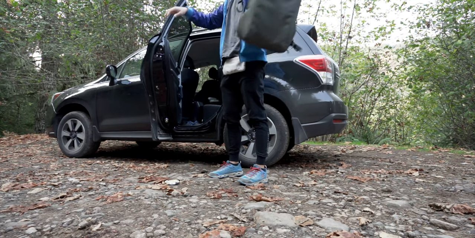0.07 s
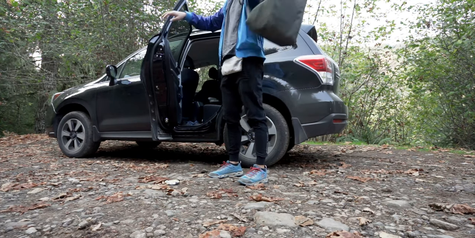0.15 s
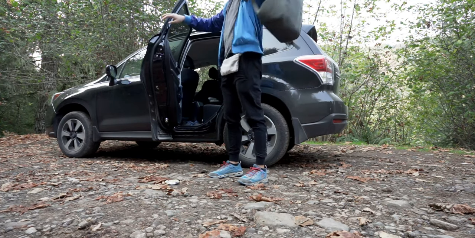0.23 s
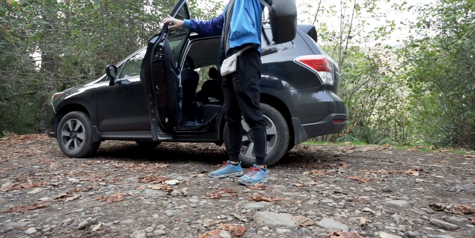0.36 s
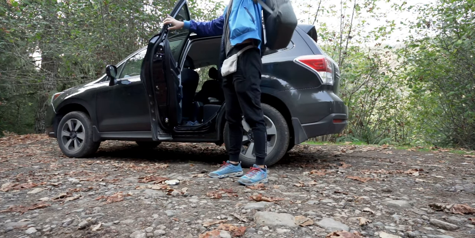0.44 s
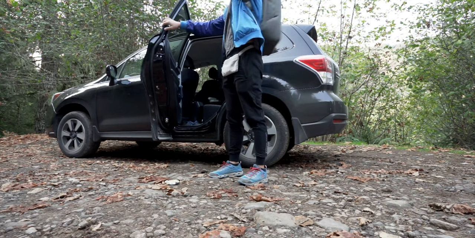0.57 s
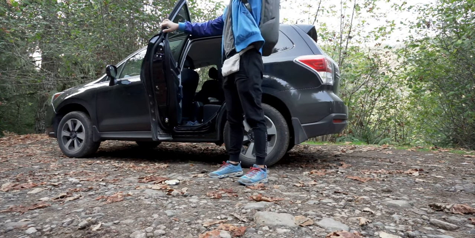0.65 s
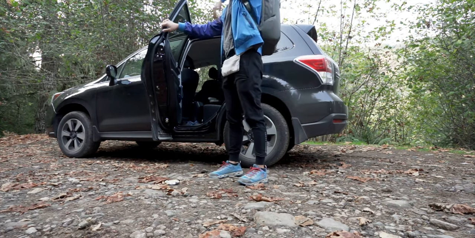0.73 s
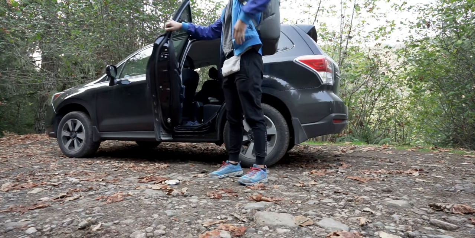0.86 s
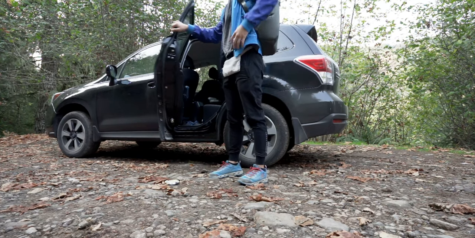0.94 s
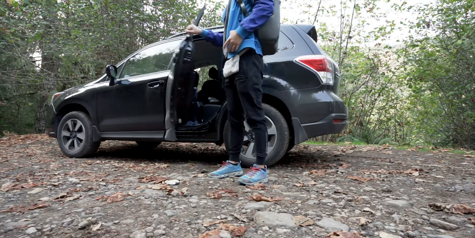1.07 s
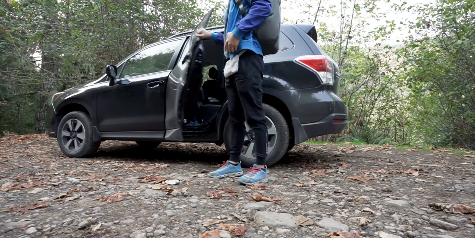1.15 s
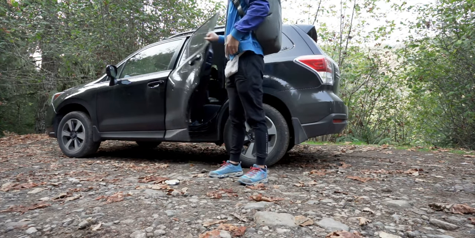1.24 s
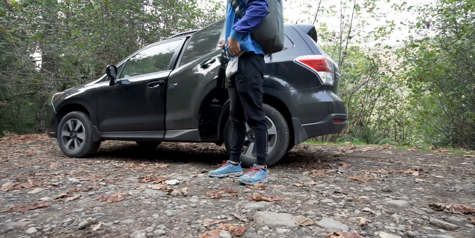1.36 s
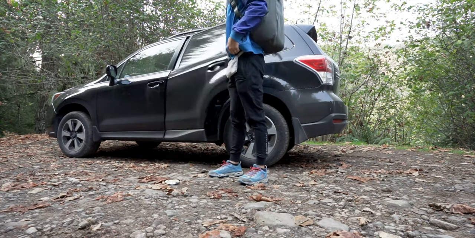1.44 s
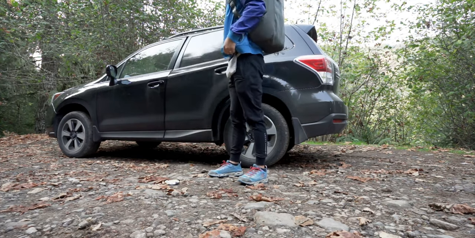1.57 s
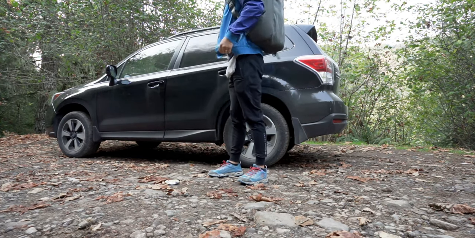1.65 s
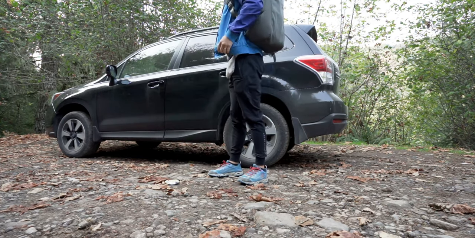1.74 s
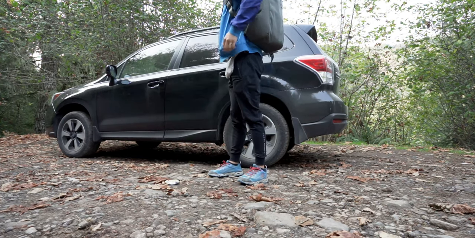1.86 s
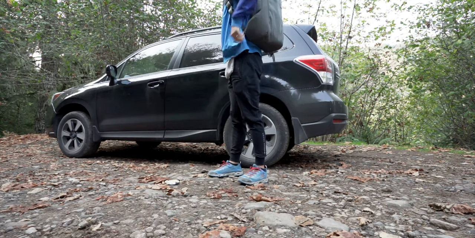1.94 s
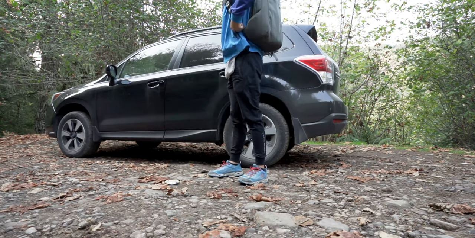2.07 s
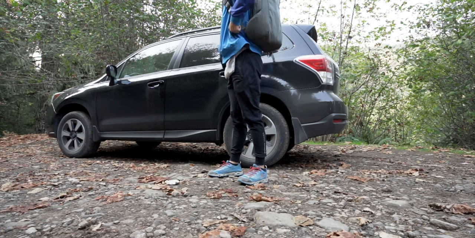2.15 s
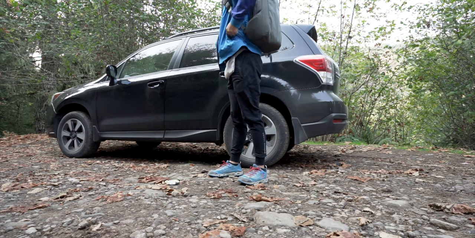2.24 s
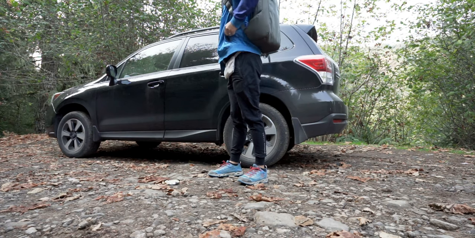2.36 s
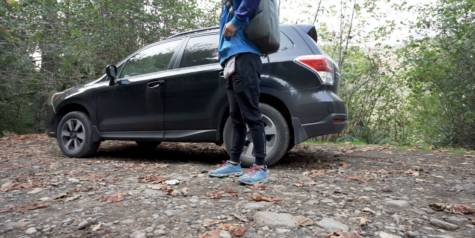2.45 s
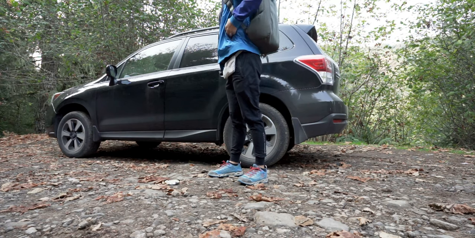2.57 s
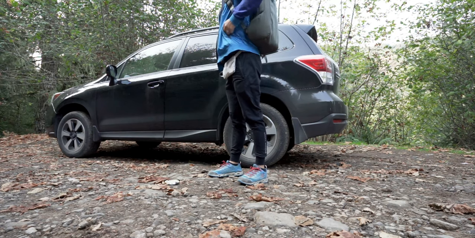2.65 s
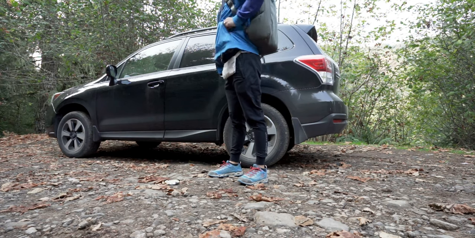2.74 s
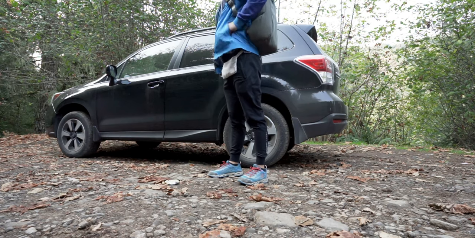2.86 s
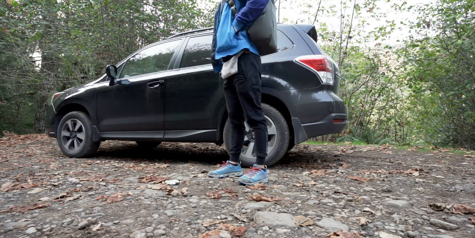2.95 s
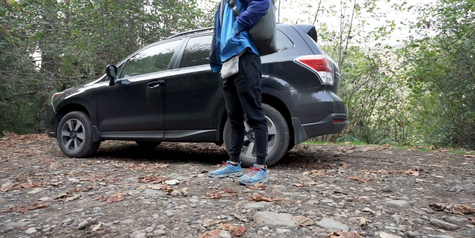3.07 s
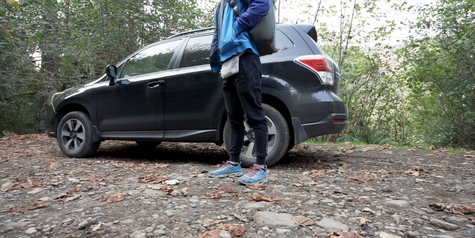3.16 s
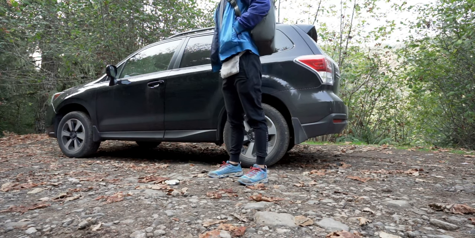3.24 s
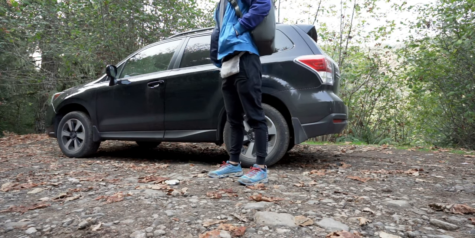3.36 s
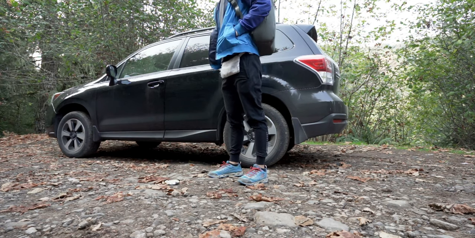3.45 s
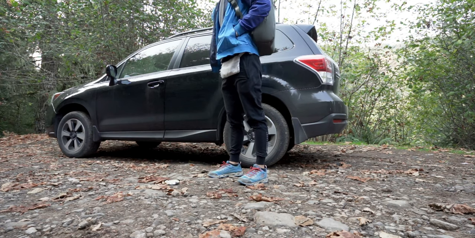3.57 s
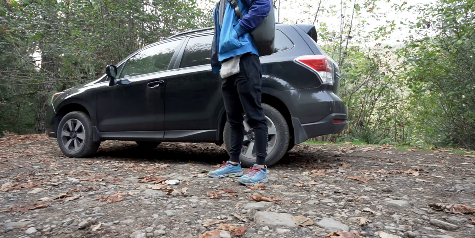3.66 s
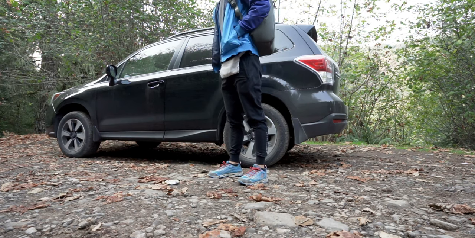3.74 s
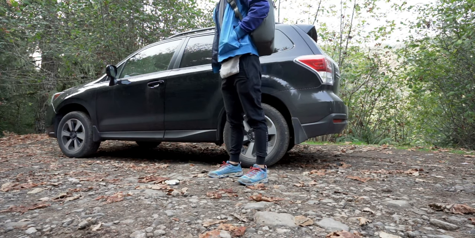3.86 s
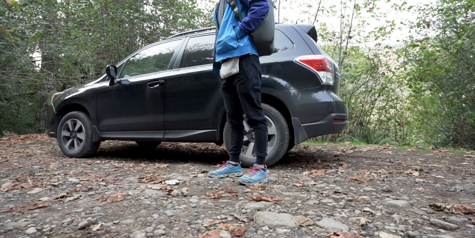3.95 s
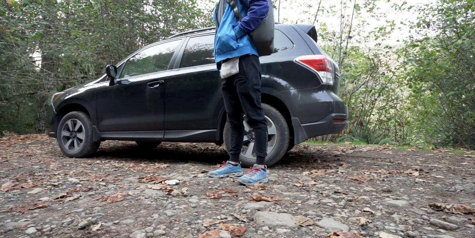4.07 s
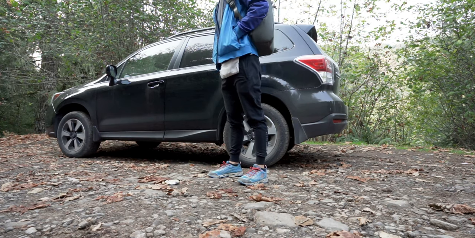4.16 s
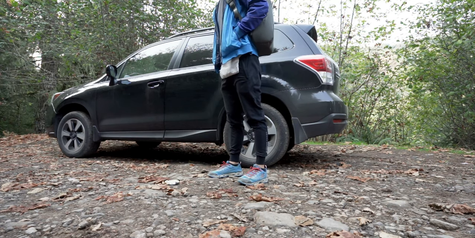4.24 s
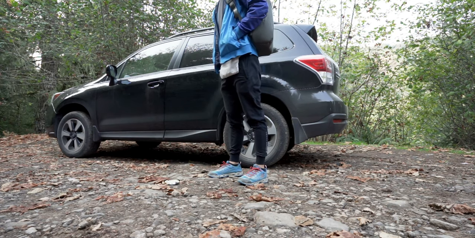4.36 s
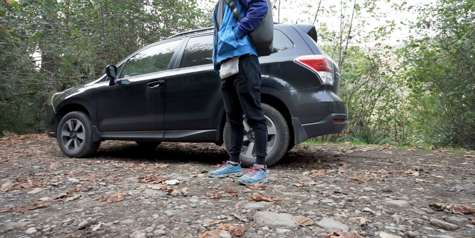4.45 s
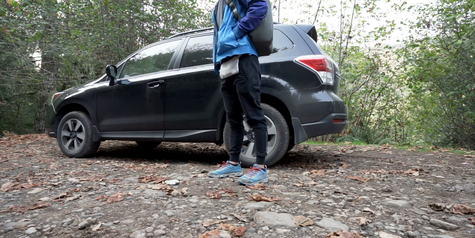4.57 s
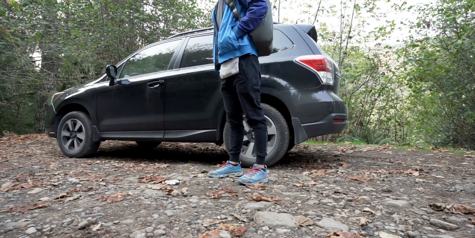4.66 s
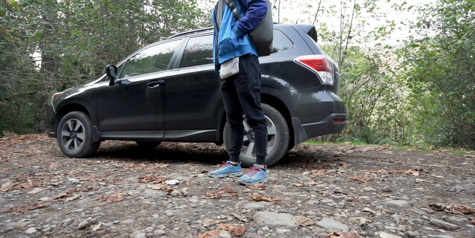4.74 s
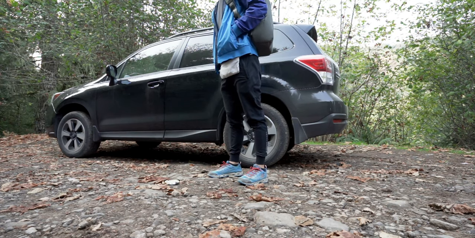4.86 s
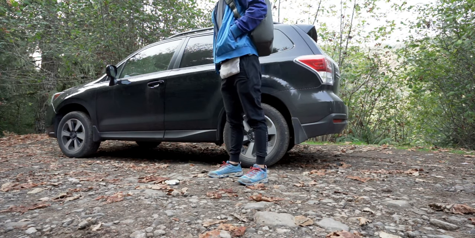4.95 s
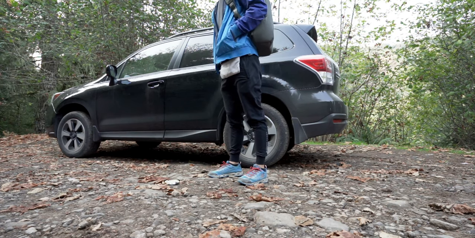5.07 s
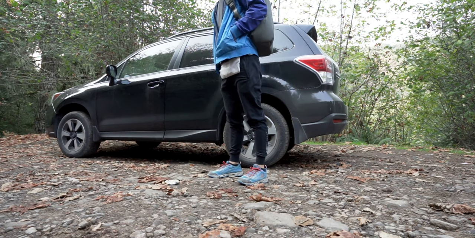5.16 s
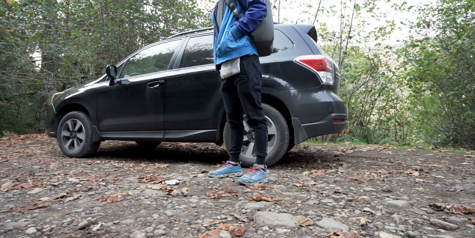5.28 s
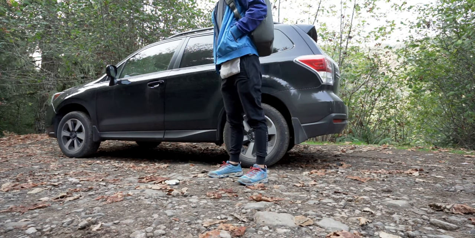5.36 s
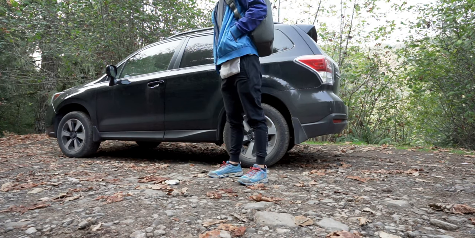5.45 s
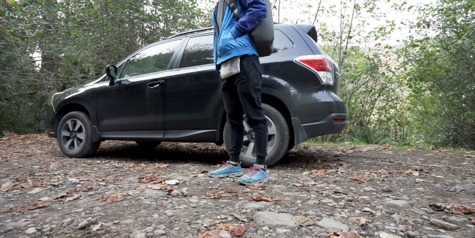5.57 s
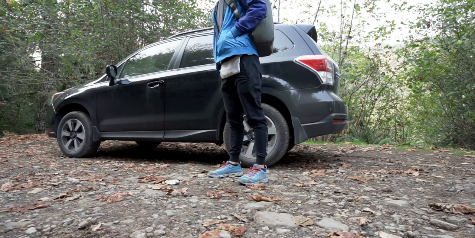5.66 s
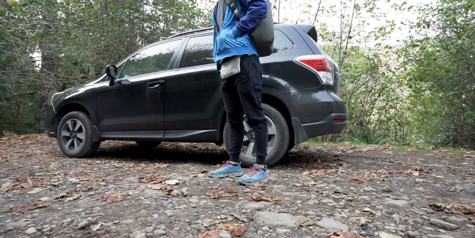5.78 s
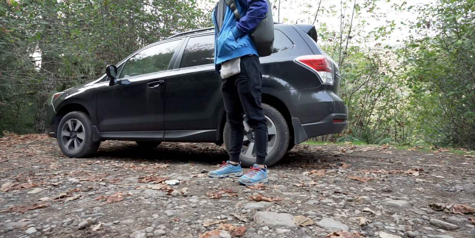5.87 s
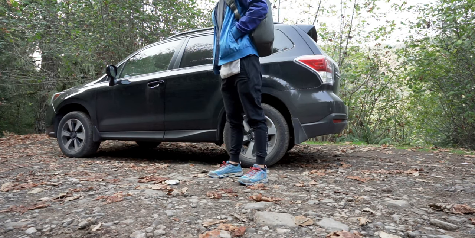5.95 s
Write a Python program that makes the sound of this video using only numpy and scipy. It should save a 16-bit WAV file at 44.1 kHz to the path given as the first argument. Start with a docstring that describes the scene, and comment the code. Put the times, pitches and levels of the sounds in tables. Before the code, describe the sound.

Soft fabric swishes and a buckle click come from someone shouldering a backpack beside a car. The door knocks lightly as it swings, then latches with a heavy, slightly distorted slam and a short rattle of trim, by far the loudest sound. Afterwards clothing rustles and small objects click in a pocket, close by, over a faint low outdoor rumble and hiss.

```python
"""Nylon rustles over a low rumble and faint woods as a hiker beside a car swings a backpack on.
A strap slides over the shoulder; buckles and small hard things in a pocket click. The car door passes
its hinge stops, latches and slams near 1.8 s: blows ring the panel and rattle loose trim, squeezed
cabin air pumps, and the input overloads. Rustle and clicks carry on, then fade.
Cloth, strap and clicks arrive twice, directly and off the gravel."""
import sys
import numpy as np
from scipy import signal
from scipy.fft import rfft, irfft
from scipy.io import wavfile
from scipy.ndimage import uniform_filter1d

SR = 44100
rng = np.random.default_rng(int(sys.argv[2]) if len(sys.argv) > 2 else 0)


def waveform_to_disk(signal):
    """Save audio, clipped to [-1, 1], as 16-bit WAV at the path in sys.argv[1]."""
    frames = np.transpose(np.atleast_2d(signal))
    scaled = np.clip(frames, -1, 1) * 32767
    samples = np.round(scaled).astype(np.int16)
    wavfile.write(sys.argv[1], SR, samples)


N = 265173

# Slow movement of jacket and pack. Each row: time in seconds, level in dB, relative treble in dB.
CLOTH_MOTION = [(0.0, -48.5, -7), (0.05, -42.5, -8.5), (0.155, -41.5, -2.5), (0.434, -40.5, -0.5),
                (0.567, -37, -7), (0.75, -43, -7), (0.9, -44, -6.5), (1.2, -46, -3.5), (1.29, -48.5, -9),
                (1.6, -52.5, -6.5), (1.96, -50, -9), (2.2, -48, -3.5), (2.5, -54.5, -3), (3.1, -45, -3.5),
                (3.45, -48, -7), (4.1, -56, -5.5), (4.6, -57, -4), (5.3, -66.5, -1), (6.011, -53.5, -9)]
# Cloth swishes. Each row: peak time in seconds, level in dB, length in ms, relative treble in dB.
CLOTH_SWISHES = [(0.641, -29.5, 26, -3.5), (0.993, -38.5, 25, -16), (1.477, -47, 84, -4),
                 (2.007, -43, 18, 0), (2.081, -41.5, 20, 8), (2.13, -40.5, 83, -4.5), (2.285, -41, 30, -3),
                 (2.365, -44.5, 42, -1.5), (2.459, -45, 27, -4), (2.599, -44, 50, -3.5),
                 (2.784, -45.5, 60, -2.5), (2.939, -41.5, 33, -5), (3.068, -42.5, 116, -6),
                 (3.387, -53, 36, -13), (3.502, -43.5, 26, -8), (3.83, -46.5, 117, -5),
                 (4.021, -48, 24, -5), (4.201, -45.5, 80, -7), (4.382, -40, 20, -8.5), (4.575, -55, 26, -7),
                 (4.7, -55, 57, -10), (4.97, -49, 190, -3), (5.064, -36, 13.5, -8), (5.188, -51.5, 27, -3),
                 (5.712, -48, 114, -4.5), (6.01, -49, 88, -6)]
# Rubbing nylon. Each row: frequency in Hz, relative density in dB.
CLOTH_SPECTRUM = [(180, -26), (300, 3), (708, 0.5), (937, 0.5), (1280, 0), (2210, -4.5), (2480, -2),
                  (4140, -2), (15500, -27.5)]
# Ground echo, later while the pack is at shoulder height. Each row: time in seconds, lag in ms.
ECHO_LAG = [(0, 1.58), (.6, 1.58), (.8, 1.27), (6.01, 1.25)]
# Pack and door rumble. Each row: time in seconds, level in dB.
RUMBLE_LEVELS = [(0, -58), (.1, -53.5), (.45, -56), (.65, -43.5), (.75, -45), (.87, -56.5), (1.03, -53),
                 (1.117, -35), (1.2, -47), (1.38, -42.5), (1.6, -47), (1.96, -41), (2.05, -47.5),
                 (2.37, -53), (2.45, -58), (3.5, -57), (4.6, -61), (6.011, -59.5)]
# Distant woods. Each row: frequency in Hz, relative density in dB.
WOODS_SPECTRUM = [(15, -32), (25, -8), (64, -3), (178, -21.5), (215, -22), (482, -19.5), (826, -16.5),
                  (1050, -16.5), (1240, -17.5), (15500, -39.5)]
# Buckle, latch and pocket clicks. Each row: start in seconds, level in dB, ring in Hz,
# relative brightness in dB, decay time in ms.
HARD_CLICKS = [(0.2252, -29, 780, -15.5, 3), (0.6573, -15.5, 1170, -28, .8), (0.668, -27, 695, -10, 4.4),
               (0.6944, -19.5, 624, -22, 1.8), (0.7458, -28, 656, -25, 3.4), (0.9484, -26, 584, -13, 0.83),
               (0.984, -26, 1700, -5.5, 3.6), (0.998, -31, 800, -25, 3), (1.046, -28, 570, -8, 3),
               (1.0649, -31, 559, -1, 2), (1.5627, -32.5, 559, -7, 1.8), (1.6304, -31, 1270, -30, 2.2),
               (1.7852, -8, 1500, -22, 1.6), (1.9843, -32, 1733, -11, 1.6), (1.9998, -29, 3770, -14, 1.7),
               (2.1577, -28.5, 1750, 1, 1.5), (2.3684, -26, 845, -16, 1), (2.4998, -25, 1810, -6, 1.2),
               (2.5973, -35.5, 950, -13, 3.5), (2.711, -35.5, 12500, 3, 0.74),
               (2.916, -28.5, 2745, -7, 1.7), (2.927, -26.5, 3900, -2, 3.4), (2.9362, -30, 1302, -1, 1.0),
               (3.0343, -24, 3219, -1, 1.3), (3.0646, -26.5, 1670, -13, 1.9),
               (3.225, -27.5, 3130, -15, 0.86), (3.3843, -32, 2853, -5, 2), (3.3948, -27.5, 3270, -6, 2.3),
               (3.4911, -34, 3003, -13, 3.2), (3.505, -18.5, 3230, -9.5, 1.65),
               (3.5487, -18, 3880, -23, 4.7), (3.5525, -18, 1710, 0, 2.9), (3.5704, -20, 1820, -11, 1.6),
               (3.588, -31.5, 1614, -11, 3.0), (3.6882, -34, 2454, -8, 1.6),
               (3.7322, -28.5, 7900, -2, 0.66), (3.7664, -37, 1561, 3, 2.8), (3.848, -26, 2380, -14, 1.6),
               (3.852, -19.5, 1750, -11.5, 1.66), (3.8839, -27, 3800, -17, 1.8),
               (3.925, -23.5, 3402, -9, 1), (4.0277, -28, 1750, -1.5, 2.3), (4.0744, -35.5, 2508, -15, 2.9),
               (4.175, -27, 2540, -7, 2.2), (4.1902, -22.5, 3160, -7, 1.1), (4.2158, -21.5, 3370, -7, 3.9),
               (4.488, -30.5, 13500, -16, 1.4), (4.5622, -32.5, 2422, -6.5, 2.1),
               (4.681, -32, 2350, -8, 1.4), (4.688, -34, 2400, -7, 1.2), (4.7878, -28.5, 1630, -6, 2.9),
               (4.8878, -31, 2906, -7, 0.61), (4.9566, -27, 2900, -15, 1.3),
               (4.9814, -26.5, 2487, -15, 3.5), (5.0515, -26.5, 3340, 1.5, 3.2),
               (5.055, -25, 3540, -1, 3.7), (5.0604, -25, 2573, 5, 3.2), (5.072, -23.5, 3200, -2, 1.1),
               (5.1013, -31, 1800, -18, 1.8), (5.1287, -36, 3262, -14, 1.8), (5.141, -32.5, 3220, -18, 1.6),
               (5.1763, -26.5, 1880, -14, 2.6), (5.1958, -32.5, 2250, -16, 2.1),
               (5.219, -37.5, 3150, -8, 3.0), (5.285, -45, 3260, -13, 3.2), (5.4178, -35, 3300, -4, 1.7),
               (5.4746, -28.5, 3950, -3.5, 3.4), (5.518, -27, 1900, -16, 1.2),
               (5.656, -31.5, 3316, -17, 0.9), (5.681, -36, 2400, -7.3, 0.9), (5.722, -38, 3000, -6, 1),
               (5.731, -38, 2500, 0, .7)]
# Blows on the car body. Each row: start in seconds, strength in dB, contact in ms, low cut in Hz,
# rattle drive in dB.
DOOR_BLOWS = [(0.6578, -20.5, 0.86, 483, -40), (0.658, -31, 4.7, 87.5, -34), (0.682, -40, 1.8, 90, -35),
              (0.716, -45, 9.9, 70.5, -58), (1.097, -29.5, 1.45, 250, -35), (1.119, -29, 2, 150, -40),
              (1.162, -36, 5.3, 60, -58), (1.367, -22.5, 2.23, 134, -29.5), (1.395, -31.5, 4.2, 80, -59),
              (1.693, -27, 4.3, 80, -54), (1.7645, -2.5, 1.9, 240, -15), (1.782, -2, 2.7, 40, -8),
              (1.7852, -8, 1.66, 500, -8), (1.807, -6.5, 4.5, 50, -21), (1.814, -12, 12, 50, -35),
              (1.828, -9.5, 3.3, 79, -29.5), (1.847, -18.5, 2.6, 80, -25), (3.052, -36, 4.1, 90, -38),
              (3.079, -35.5, 2.7, 90, -60)]
# Door panel modes. Each row: frequency in Hz, gain in dB.
PANEL_MODES = [(58, -2), (78, -18.5), (95, -12), (122, -4), (150, -14), (172, -4.5), (210, -16),
               (243, -10.5), (291, -6.5), (327, -19), (380, -6.5), (425, -10.5), (488, -22.5), (540, -1.5),
               (613, -11.5), (721, -43.5), (812, -9), (940, -21.5), (1050, -17), (1267, -19), (1386, -18.5)]
# Body shudder and loose trim. Each row: band frequency in Hz, gain in dB, T60 in seconds.
TRIM_BANDS = [(50, -17.5, 0.58), (168, -22, 0.65), (120, -9, 0.34), (214, -8.5, 0.26), (430, -6.5, 0.17),
              (1003, -7, 0.12), (1895, -11.5, 0.054), (3630, -24, 0.085), (7000, -28, 0.089),
              (12000, -50.5, 0.032)]


def undb(db):
    return 10 ** (np.asarray(db) / 20)


def unit_rms(x):
    return x / np.sqrt(np.mean(x ** 2))


def curve(points):
    """Per-sample values through (seconds, value) points."""
    return np.interp(np.arange(N) / SR, *np.transpose(points))


def shaped_noise(spectrum):
    """Noise shaped by (Hz, dB) points on a log axis; rms 1."""
    hz, db = np.transpose(spectrum)
    bins_hz = np.maximum(np.arange(N // 2 + 1) * SR / N, 1)
    gain = undb(np.interp(np.log(bins_hz), np.log(hz), db))
    return unit_rms(irfft(rfft(rng.standard_normal(N)) * gain, N))


def band(x, low_hz, high_hz):
    sos = signal.butter(2, [low_hz, min(high_hz, SR / 2.1)], "band", fs=SR, output="sos")
    return signal.sosfilt(sos, x)


def band_noise(low_hz, high_hz):
    return unit_rms(band(rng.standard_normal(N), low_hz, high_hz))


def ring(x, hz, t60_s):
    """One decaying mode; a unit impulse rings with amplitude 1."""
    pole = np.exp(2j * np.pi * hz / SR - np.log(1000) / (t60_s * SR))
    return signal.lfilter([1], [1, -pole], x).imag


def wander(rate_hz):
    """Slewed random steps; rms 1."""
    hold = int(SR / rate_hz)
    steps = np.repeat(rng.standard_normal(N // hold + 1), hold)
    return unit_rms(uniform_filter1d(steps, hold)[:N])


def with_ground_echo(x, gain=0.4):
    """Adds the softer, duller path off the gravel, which combs the spectrum."""
    samples = np.arange(N)
    echo = np.interp(samples - curve(ECHO_LAG) * SR / 1000, samples, x)
    return x + gain * signal.lfilter([0.5], [1, -0.5], echo)


def rustle(rise_lengths=0.87, fall_lengths=0.9):
    """Nylon rubs in dense uneven grains: slow movement plus swishes; stiff folds hiss higher."""
    t = np.arange(N) / SR
    times_s, db, treble_db = np.transpose(CLOTH_MOTION)
    mid_power = undb(np.interp(t, times_s, db)) ** 2
    treble_power = undb(np.interp(t, times_s, db + treble_db)) ** 2
    for peak_s, db, length_ms, treble_db in CLOTH_SWISHES:
        age_lengths = 1000 * (t - peak_s) / length_ms
        swish = undb(db) * np.exp(np.minimum(age_lengths / rise_lengths, -age_lengths / fall_lengths))
        mid_power += swish ** 2
        treble_power += (swish * undb(treble_db)) ** 2
    mid = band(shaped_noise(CLOTH_SPECTRUM), 590, 2970)
    treble = band(shaped_noise(CLOTH_SPECTRUM), 6610, 15900)
    grain = undb(1.05 * wander(rate_hz=300) + 1.2 * wander(rate_hz=50))
    mid = np.sqrt(mid_power) * unit_rms(grain * mid)
    treble = np.sqrt(treble_power) * unit_rms(grain * treble)
    return with_ground_echo(mid + treble)


def rumble(flutter_db=2.6):
    """Low uneven noise from the pack and the swinging door."""
    return band_noise(78, 425) * undb(curve(RUMBLE_LEVELS) + flutter_db * wander(rate_hz=25))


def woods(level_db=-53.5, swell_db=0.97):
    """Distant rumble and faint hiss, swelling a little."""
    return shaped_noise(WOODS_SPECTRUM) * undb(level_db + swell_db * wander(rate_hz=0.72))


def clicks(ring_db=3.0, top_re_edge_db=-18):
    """Hard parts click in scratchy bursts: a ring over a broad body, a bright edge, a thin top."""
    n = 2048
    out, t_ms = np.zeros(N + n), 1000 * np.arange(n) / SR
    for start_s, db, ring_hz, bright_db, decay_ms in HARD_CLICKS:
        age = t_ms / decay_ms
        burst = rng.laplace(size=n) * np.exp(-age) * (1 - np.exp(-age / 0.25))
        low_hz = max(min(1400, ring_hz / 1.4), ring_hz / 2.2)
        body = band(burst, low_hz, 3 * low_hz)
        body = band(body, low_hz / 2.6, max(5200, 1.5 * ring_hz))
        body += undb(ring_db) * band(burst, ring_hz / 1.12, ring_hz * 1.068)
        edge, top = band(burst, 4800, 8600), band(burst, 10500, 15500)
        body, edge, top = (part / np.abs(part).max() for part in (body, edge, top))
        click = body + undb(bright_db) * (edge + undb(top_re_edge_db) * top)
        out[int(start_s * SR):][:n] += undb(db) * click
    return with_ground_echo(out[:N], gain=0.37)


def strap(start_s=0.26, end_s=0.54, gain_db=-42.5, centre_hz=2100, width_ratio=1.3):
    """The nylon strap slides over the shoulder: one narrow-band stroke that swells and stops."""
    progress = np.clip((np.arange(N) / SR - start_s) / (end_s - start_s), 0, 1)
    sliding = (progress > 0) & (progress < 1)
    swell = np.sqrt(np.sin(np.pi * progress ** 1.3) + 1e-9) * sliding
    friction = band_noise(centre_hz / width_ratio, centre_hz * width_ratio)
    grain = undb(1.5 * wander(rate_hz=59))
    return with_ground_echo(undb(gain_db) * swell * friction * grain)


def door(t60_at_100hz_s=0.26, loss_exponent=0.5):
    """Blows ring the panel and shake the trim; long contacts lack treble, small parts lack bass."""
    push, shake = np.zeros(N), np.zeros(N)
    for start_s, db, contact_ms, low_hz, rattle_db in DOOR_BLOWS:
        start, n = int(start_s * SR), int(contact_ms * SR / 1000)
        pulse = np.zeros(4096)
        pulse[:n] = np.hanning(n + 2)[1:-1] * 2 / n
        push[start:][:len(pulse)] -= undb(db) * band(pulse, low_hz, 18900)
        shake[start:][:n] += undb(rattle_db) * pulse[:n]
    panel = np.zeros(N)
    for k, (hz, db) in enumerate(PANEL_MODES):
        t60_s = t60_at_100hz_s * (100 / hz) ** loss_exponent
        panel += (-1) ** k * undb(db) * ring(push, hz, t60_s)  # neighbours move air in opposite senses
    return panel + trim_rattle(shake)


def trim_rattle(shake):
    """The body shudders and loose trim rattles: noise bands that decay after each blow."""
    out = np.zeros(N)
    for hz, db, t60_s in TRIM_BANDS:
        pole = np.exp(-np.log(1000) / (t60_s * SR))
        envelope = signal.lfilter([1], [1, -pole], shake)
        out += undb(db) * envelope * band_noise(hz / 1.5, hz * 1.28)
    return out


def cabin_air(start_s=1.777, hz=30.5, gain_db=2.6, rise_s=0.018, t60_s=0.3):
    """The shutting door compresses the cabin air, which pumps a few deep cycles."""
    age_s = np.maximum(np.arange(N) / SR - start_s, 0)
    envelope = np.exp(-np.log(1000) * age_s / t60_s) * (1 - np.exp(-age_s / rise_s))
    return -undb(gain_db) * envelope * np.sin(2 * np.pi * hz * age_s)


def scene():
    return (rustle() + rumble() + woods() + clicks() + strap() + door() + cabin_air())[None]


def record(dry, cutoff_hz=15700):
    """The slam clips the input; a steep low-pass cuts the top."""
    lowpass = signal.ellip(8, 0.1, 70, cutoff_hz, fs=SR, output="sos")
    return signal.sosfilt(lowpass, np.clip(dry, -1, 1))


dry = scene()
out = record(dry)
waveform_to_disk(out)
```